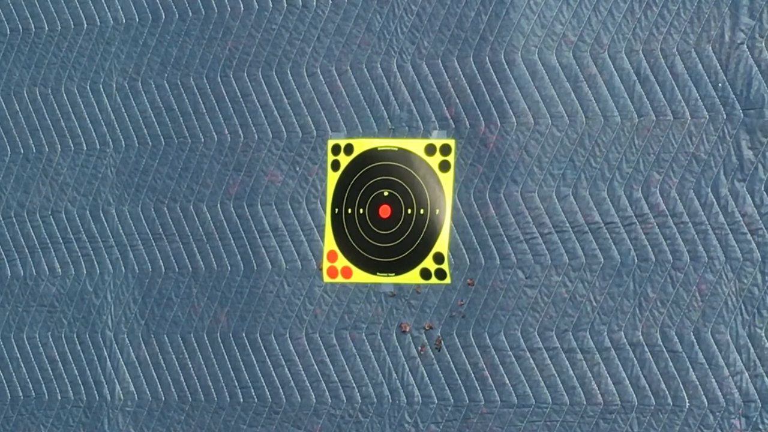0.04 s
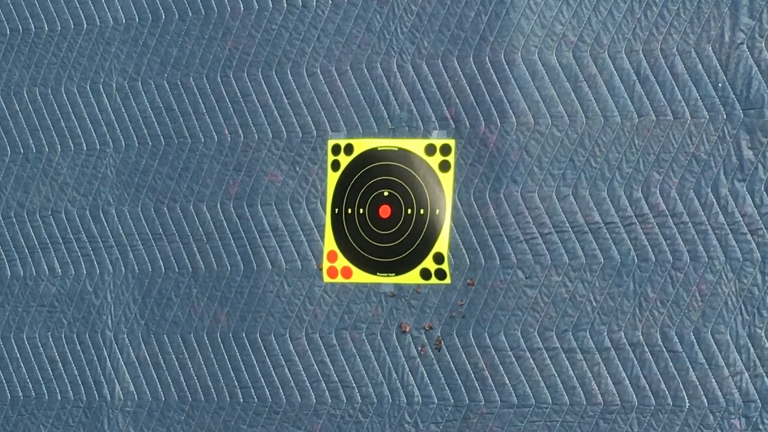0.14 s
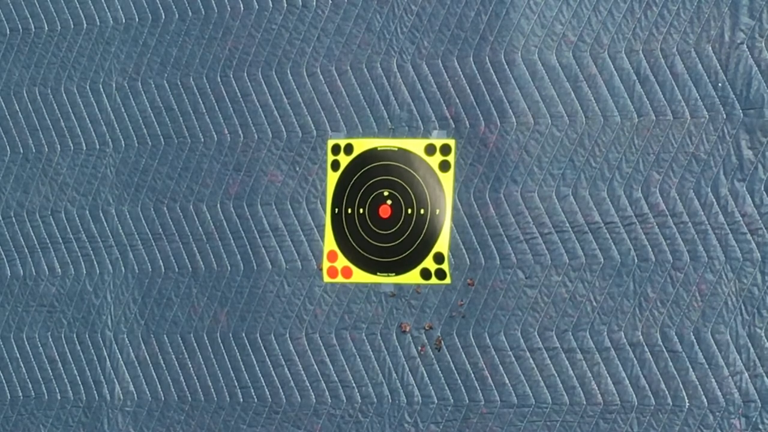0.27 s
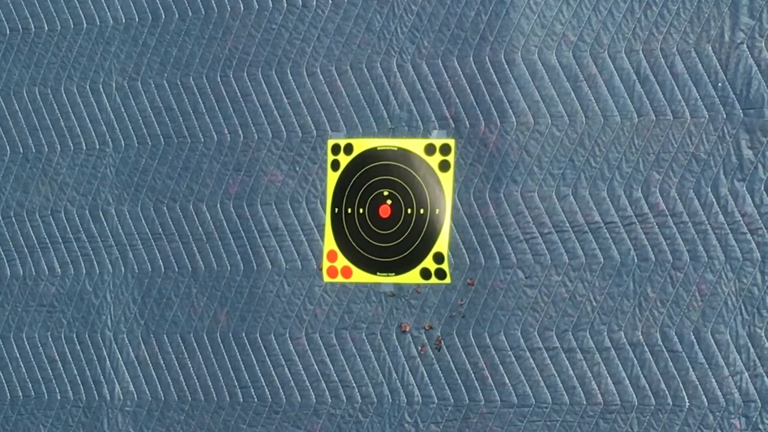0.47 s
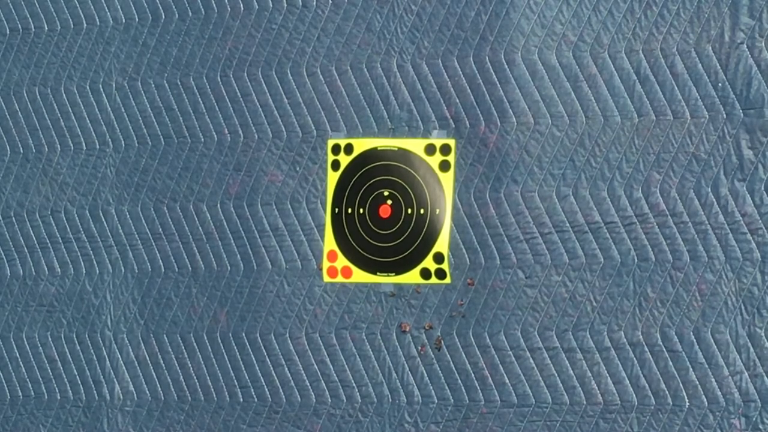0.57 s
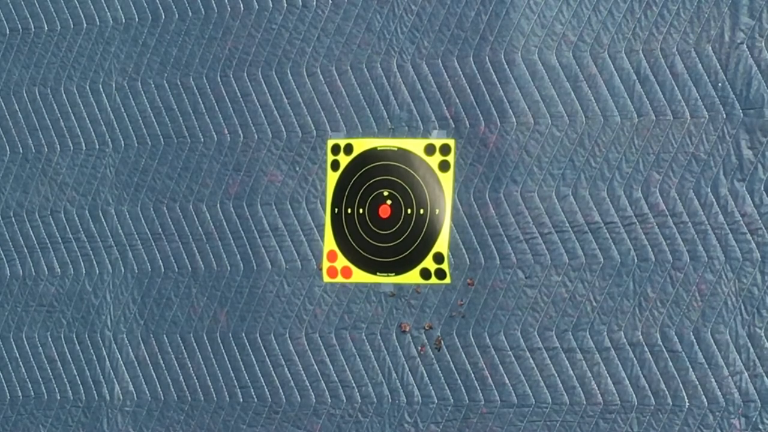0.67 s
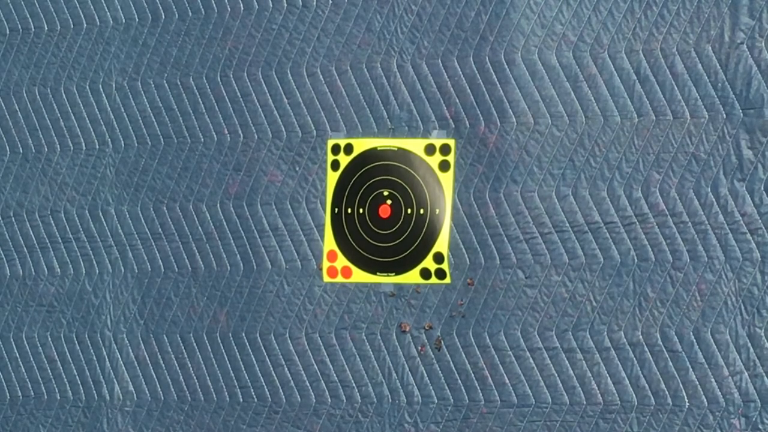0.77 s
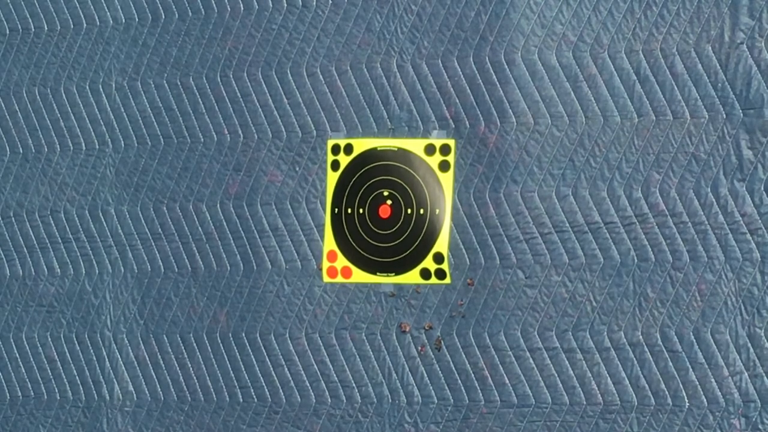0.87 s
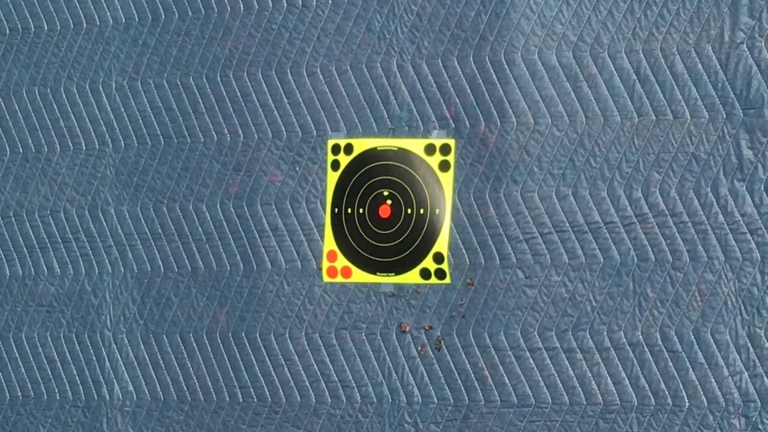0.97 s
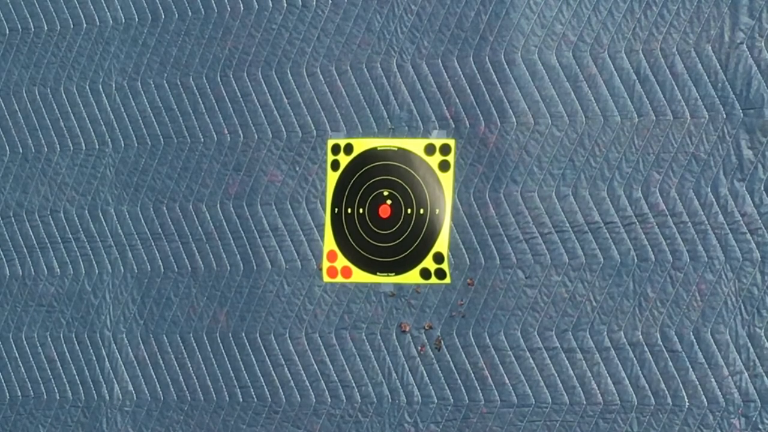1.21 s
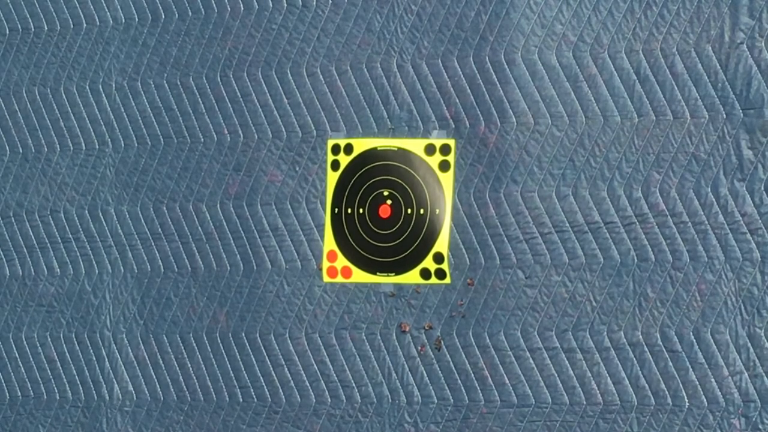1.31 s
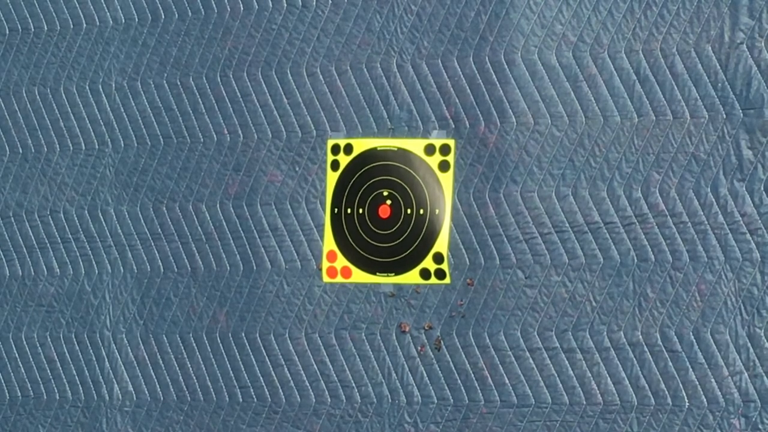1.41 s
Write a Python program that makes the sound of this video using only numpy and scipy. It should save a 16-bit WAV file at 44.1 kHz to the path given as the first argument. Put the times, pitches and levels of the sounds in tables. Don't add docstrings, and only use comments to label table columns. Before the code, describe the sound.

A gas-powered air pistol fires once beside the microphone, a harsh overloaded crack with metal slide clatter; yard walls echo briefly, then a distant pellet ticks and a dry snap follows over faint street hiss.

```python
import sys
import numpy as np
from scipy import signal
from scipy.fft import rfft, irfft
from scipy.io import wavfile

SR = 44100
rng = np.random.default_rng(int(sys.argv[2]) if len(sys.argv) > 2 else 0)


def store_pcm(level_fs):
    pcm = np.round(np.clip(level_fs, -1, 1) * 32767).astype(np.int16)
    wavfile.write(sys.argv[1], SR, np.atleast_2d(pcm).T)


def invert_db(level):
    return 10 ** (np.asarray(level, dtype=float) / 20)


N = 63945


def rms_one(x):
    return x / np.sqrt(np.mean(x ** 2) + 1e-20)


def at_hz(points, hz):
    p = np.array(points)
    log_hz = np.log(np.maximum(hz, 1))
    return np.interp(log_hz, np.log(p[:, 0]), p[:, 1], left=p[0, 1], right=p[-1, 1])


def drift(rate_hz, size):
    r = np.exp(-2 * np.pi * rate_hz / SR)
    wander = signal.lfilter([1], [1, -2 * r, r * r], rng.standard_normal(size + SR))
    return rms_one(wander[SR:])


def coloured(spectrum, size):
    hz = np.arange(size // 2 + 1) * SR / size
    low_fade = np.minimum(1, (hz / spectrum[0][0]) ** 4)
    white = rfft(rng.standard_normal(size))
    return rms_one(irfft(white * invert_db(at_hz(spectrum, hz)) * low_fade, size))


def resonate(x, hz, width_hz):
    r = np.exp(-np.pi * width_hz / SR)
    return rms_one(signal.lfilter([1, 0, -1], [1, -2 * r * np.cos(2 * np.pi * hz / SR), r * r], x))


# f/Hz, level/dB per Hz
STREET_COLOUR = [(400, -1.5), (1000, -2), (2800, -8), (4400, -5.5), (5600, -15), (8000, -19.5),
                 (11000, -30), (15500, -44)]
# f/Hz, level/dB per Hz
RUMBLE_COLOUR = [(15, -13), (30, 1), (90, -1.5), (180, -5.5), (260, -13.5), (420, -25.5), (650, -42.5),
                 (1100, -110)]
# f/Hz, level/dB rms
MOTOR_HUM = [(118.4, -46.5), (236.9, -57), (296.1, -62), (355.3, -62), (479.1, -71)]
AIR_DB, RUMBLE_DB = -55, -42.5
DRONE_HZ, DRONE_WIDTH_HZ, DRONE_DB = 45, 19, -42
HUM_WAVER_DB = 2.5


def background():
    t = np.arange(N) / SR
    air = invert_db(AIR_DB + 0.7 * drift(3.0, N)) * coloured(STREET_COLOUR, N)
    rumble = invert_db(RUMBLE_DB + 1.5 * drift(4.0, N)) * coloured(RUMBLE_COLOUR, N)
    drone = resonate(rng.standard_normal(N + SR), DRONE_HZ, DRONE_WIDTH_HZ)
    drone = invert_db(DRONE_DB) * resonate(drone, DRONE_HZ, 2 * DRONE_WIDTH_HZ)[SR:]
    hum = np.zeros(N)
    for hz, db in MOTOR_HUM:
        level = invert_db(db + HUM_WAVER_DB * drift(5.6, N))
        hum += level * np.sqrt(2) * np.sin(2 * np.pi * hz * t + 0.5 * drift(11.0, N))
    return air + rumble + drone + hum


FAR_WALL_S, FAR_WALL_DB, FAR_WALL_CUT_HZ = 0.1028, -26, 7000


def far_wall(shot):
    lag = int(FAR_WALL_S * SR)
    dull = signal.sosfilt(signal.butter(2, FAR_WALL_CUT_HZ, fs=SR, output="sos"), shot)
    return invert_db(FAR_WALL_DB) * np.concatenate([np.zeros(lag), dull[:-lag]])


# f/Hz, t60/s
ECHO_FALL = [(200, 0.57), (700, 0.4549), (2000, 0.5485), (4300, 0.5), (8000, 0.35), (11000, 0.41),
             (14000, 0.07)]
# f/Hz, level/dB per Hz
YARD_COLOUR = [(200, -8), (500, -16), (900, -9.5), (2500, -5.5), (4300, 1), (6000, -5), (10000, -10.5),
               (14000, -24)]
YARD_WET_DB, YARD_GAP_S, YARD_LUMPS_DB = -7, 0.01192, 1
FAR_TAIL_DB, FAR_TAIL_STRETCH = -25.5, 1.9


def yard(shot):
    t = np.arange(SR) / SR
    edges = 120 * 2 ** np.arange(0, 7.6, 0.5)
    power = np.minimum(shot ** 2, 4.0)
    started = np.cumsum(power) > 0
    tail = 0
    for low, high in zip(edges, np.minimum(edges[1:], 0.45 * SR)):
        hz = np.sqrt(low * high)
        fall_db = -60 * t / at_hz(ECHO_FALL, hz)
        near = invert_db(2 * fall_db)
        far = invert_db(2 * FAR_TAIL_DB + 2 * fall_db / FAR_TAIL_STRETCH)
        answer = (near + far) * np.clip(t / YARD_GAP_S, 0, 1)
        echo_power = np.maximum(signal.fftconvolve(power, answer)[:N], 0)
        held = np.sqrt(echo_power * 20 / SR) * started
        band_pass = signal.butter(2, [low, high], "band", fs=SR, output="sos")
        band = signal.sosfilt(band_pass, rng.standard_normal(N))
        tail = tail + band * held * invert_db(at_hz(YARD_COLOUR, hz))
    return invert_db(YARD_WET_DB + 6 + YARD_LUMPS_DB * drift(60.0, N)) * tail


SNAP_S, SNAP_DB, SNAP_WIDTH_S, SNAP_LEAN = 1.25527, -22, 0.00004, 0.7


def snap():
    u = (np.arange(N) / SR - SNAP_S) / SNAP_WIDTH_S
    return invert_db(SNAP_DB) * (SNAP_LEAN * u - 1 + u * u * 0.5) * np.exp(-u * u / 2)


ATTACK_S, RELEASE_S = 0.00038, 0.0009
RING_WIDTH_HZ, RING_STEADY, SAG_PER_S = 450, 0.63, 30


def contacts(rows, colour):
    size = 2048
    out = np.zeros((2, N + size))
    t = np.arange(size) / SR
    r = np.exp(-np.pi * RING_WIDTH_HZ / SR)
    for s, db, hold, hz, ring_db in rows:
        hiss = coloured(colour, size)
        wobble = signal.lfilter([1], [1, -r], rng.standard_normal((2, 2 * size)))
        a, b = wobble[:, size:] * np.sqrt(1 - r * r)
        phase = 2 * np.pi * hz * np.cumsum(np.exp(-SAG_PER_S * (t - hold / 2))) / SR
        ring = rms_one((a + RING_STEADY * 2) * np.cos(phase) + b * np.sin(phase))
        attack = np.sin(np.pi / 2 * np.clip(t / ATTACK_S, 0, 1)) ** 2
        shape = attack * np.exp(-np.maximum(t - max(hold, 0), 0) / RELEASE_S)
        burst = shape * np.array([hiss, invert_db(ring_db) * ring])
        even = np.sqrt(np.sum(shape ** 2) / np.sum(burst.sum(axis=0) ** 2))
        start = int(s * SR)
        out[:, start:start + size] += invert_db(db) * burst * even
    return out[:, :N]


# f/Hz, level/dB per Hz
PELLET_COLOUR = [(1500, -12), (3700, -2), (5000, -7), (6200, -1), (7500, -6), (10500, -11), (12500, -26),
                 (15500, -50)]
# t/s, level/dB, hold/s, ring f/Hz, ring over hiss/dB
PELLET_TICKS = [
    (.4698, -29.5, 0.0014, 4274, 0.5),
    (1.0274, -41, 0.00083, 6060, -1),
    (1.0276, -47, 0.00088, 3780, 7.5),
    (1.0455, -55.5, 0.001, 5000, -7.5),
    (1.0503, -42, 0.0018, 3786, 1),
    (1.0507, -47, .0014, 6150, 9),
    (1.0680, -58, 0.01, 4270, 0.5),
    (1.1553, -50.5, .0013, 3950, 2.5),
    (1.1605, -47.5, 0.0037, 4270, 6),
    (1.1790, -53, .0032, 3530, 5),
]


def pellet():
    return contacts(PELLET_TICKS, PELLET_COLOUR).sum(axis=0)


# t/s, level/dB, length/s
GAS_PUSHES = [
    (0.2484, -4.5, .0048),
    (.2925, -17, .0024),
]
# f/Hz, level/dB, t60/s
GRIP_THUMP = [
    (271, -12, 0.049),
    (750, -17.5, .04),
    (1105, -18.5, 0.0398),
]
THUMP_S, PUSH_CUT_HZ = 0.2495, 11


def pushes():
    t = np.arange(N) / SR
    shove = np.zeros(N)
    for s, db, length in GAS_PUSHES:
        shove += invert_db(db) * np.sin(np.pi * np.clip((t - s) / length, 0, 1))
    since = np.maximum(t - THUMP_S, 0)
    thump = np.zeros(N)
    for hz, db, t60 in GRIP_THUMP:
        thump += invert_db(db) * np.exp(-np.log(1000) * since / t60) * np.sin(2 * np.pi * hz * since)
    return signal.sosfilt(signal.butter(1, PUSH_CUT_HZ, "high", fs=SR, output="sos"), shove) + thump


# f/Hz, level/dB per Hz
GAS_COLOUR = [(150, -5.5), (480, -17), (950, -6.5), (2500, -2.5), (4200, -1), (9500, -3), (12000, -18.5),
              (15500, -50)]
# t/s, level/dB, hold/s, ring f/Hz, ring over hiss/dB
PISTOL_ACTION = [(.2448, -18, 0.0041, 3180, 2), (.2478, 2.5, 0.002, 7240, 0),
                 (.2503, -0.5, 0.0029, 3940, 3), (.2545, -9.5, 0.0036, 3910, -4.5),
                 (.2624, 0, .0045, 4290, 3), (.2685, -7.5, .002, 3980, -2), (.2724, -5, 0.0027, 3500, -4),
                 (.2775, -13.5, 0.0054, 7015, -11.5), (.2855, -10, 0.0017, 8000, -1),
                 (.2880, 6.5, 0.0037, 4400, 18.5), (.2935, -5, 0.0022, 2800, 0.5),
                 (.3021, -4.5, 0.0018, 2400, -2), (.3045, -3.5, .003, 3970, 1), (.3120, -11, .002, 4494, 6),
                 (.3163, -1.5, .0019, 5010, 7.5), (.3275, -18, .0025, 4350, -8.5),
                 (.3310, -10.5, 0.0037, 4500, 2.5)]


def pistol():
    return contacts(PISTOL_ACTION, GAS_COLOUR).sum(axis=0)


def scene():
    shot = pistol()
    heard = shot + pushes() + yard(shot) + far_wall(shot)
    return (heard + pellet() + snap() + background())[None]


def roll_off(x):
    return signal.sosfilt(signal.butter(12, 15680, fs=SR, output="sos"), x)


OVERLOAD = 1.05


def record(dry):
    mix = np.clip(dry, -OVERLOAD, OVERLOAD)
    return roll_off(mix)


dry = scene()
out = record(dry)
store_pcm(out)
```